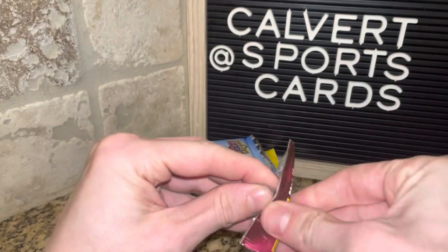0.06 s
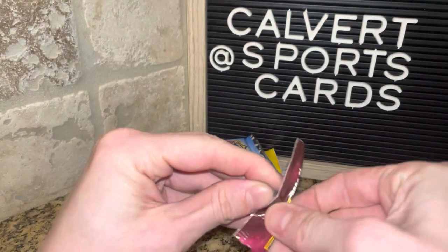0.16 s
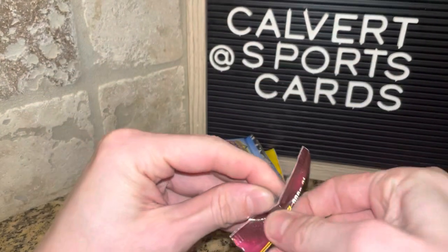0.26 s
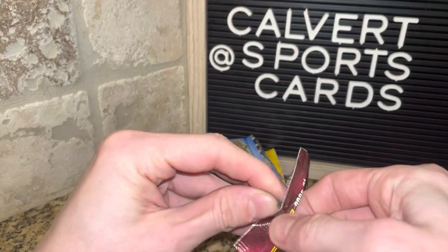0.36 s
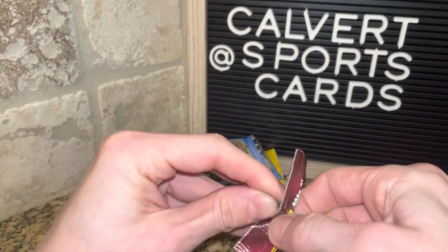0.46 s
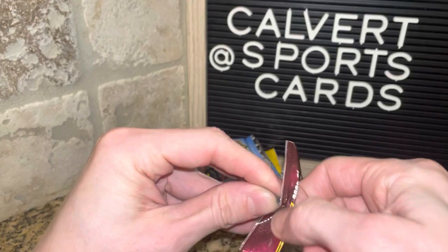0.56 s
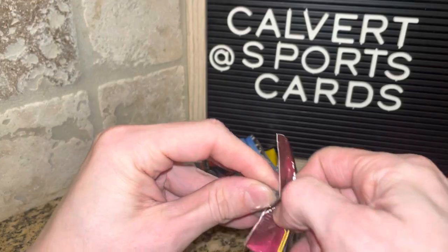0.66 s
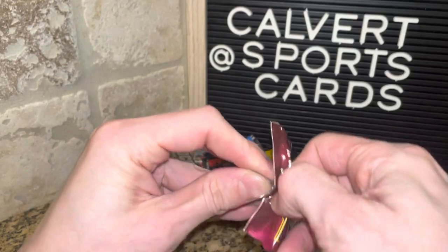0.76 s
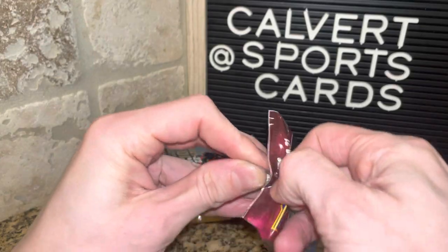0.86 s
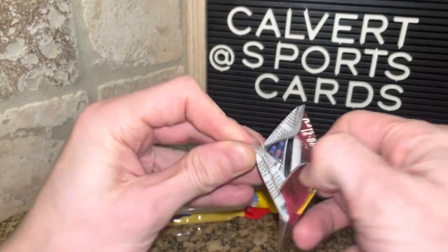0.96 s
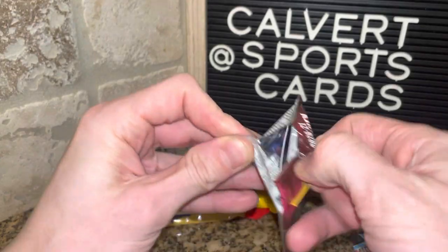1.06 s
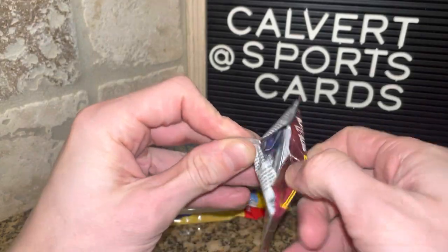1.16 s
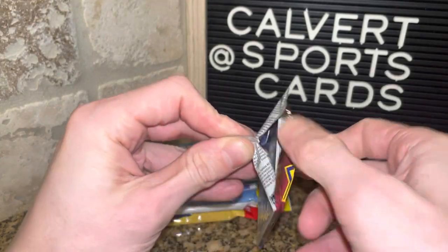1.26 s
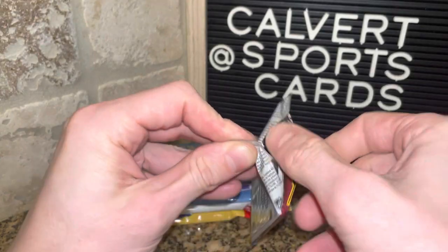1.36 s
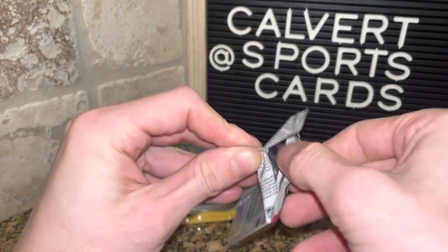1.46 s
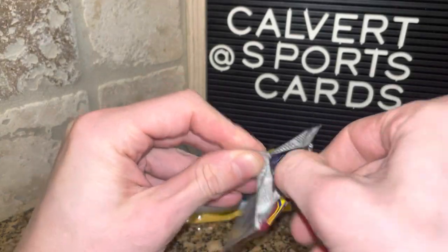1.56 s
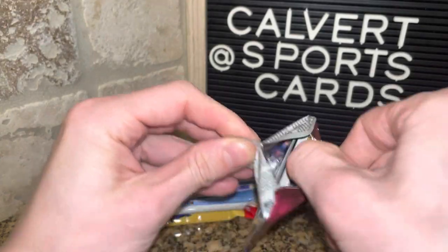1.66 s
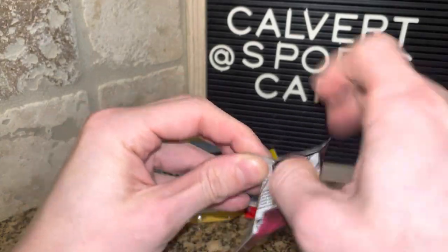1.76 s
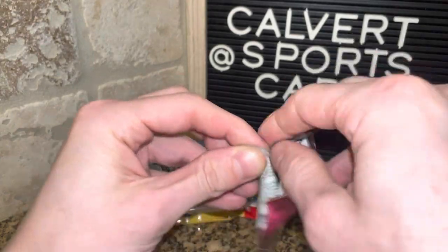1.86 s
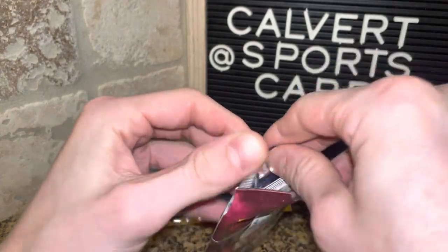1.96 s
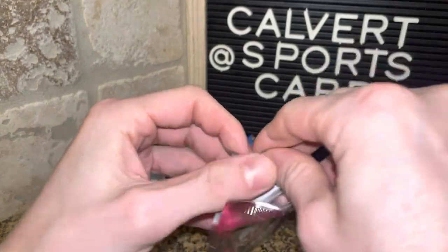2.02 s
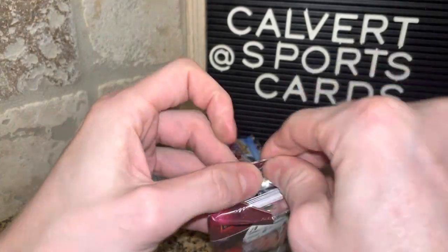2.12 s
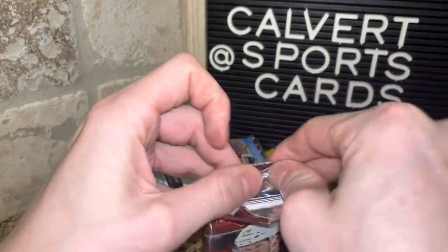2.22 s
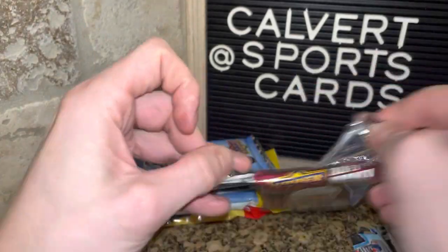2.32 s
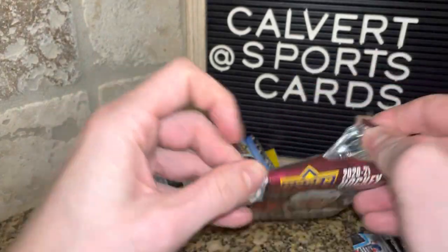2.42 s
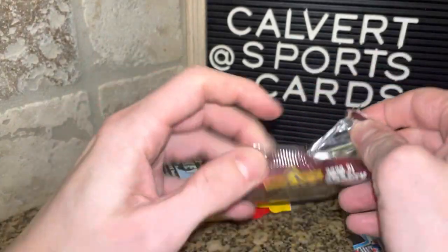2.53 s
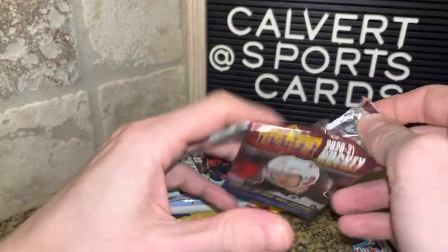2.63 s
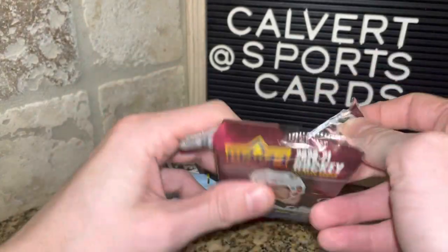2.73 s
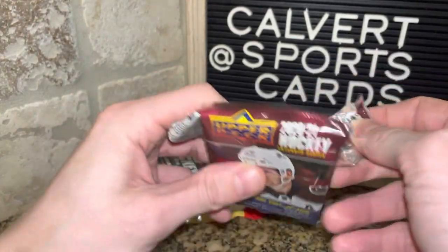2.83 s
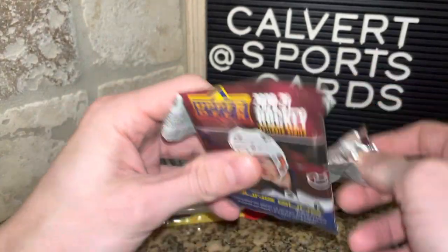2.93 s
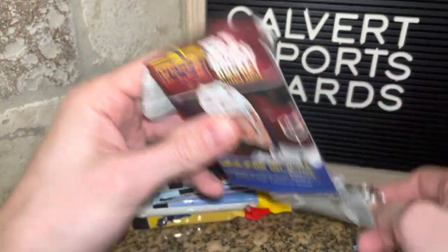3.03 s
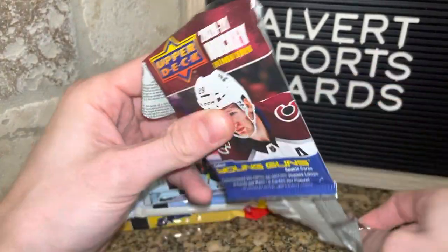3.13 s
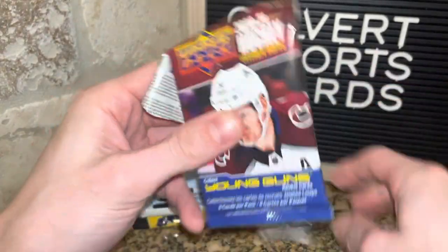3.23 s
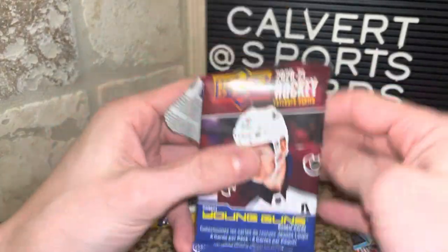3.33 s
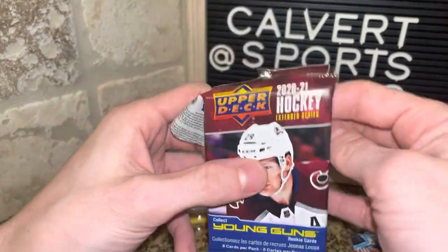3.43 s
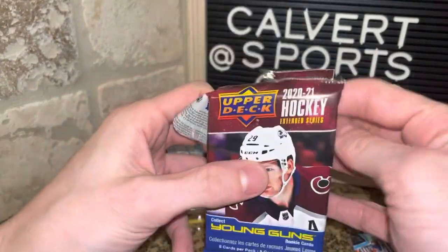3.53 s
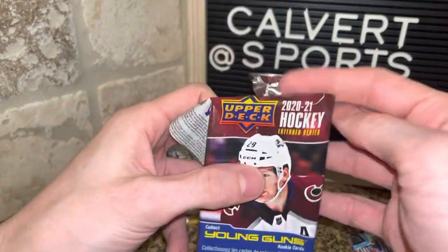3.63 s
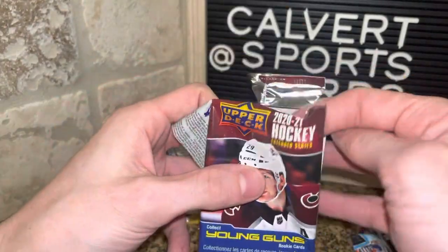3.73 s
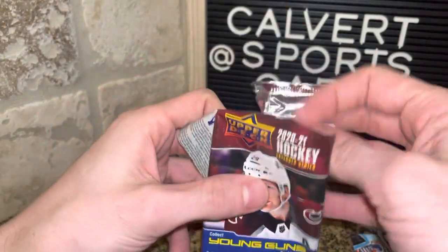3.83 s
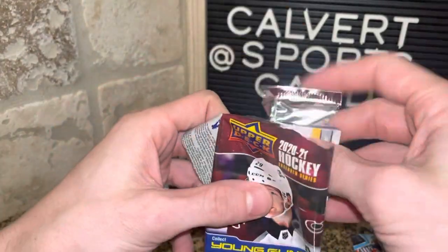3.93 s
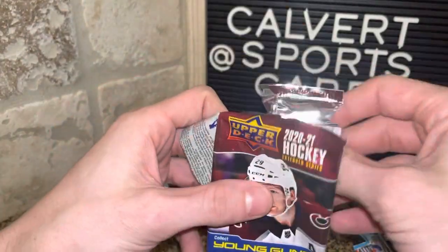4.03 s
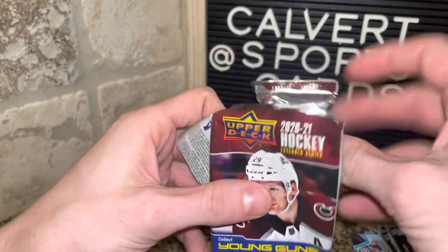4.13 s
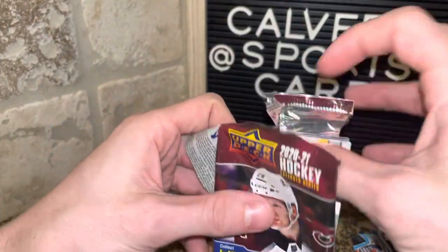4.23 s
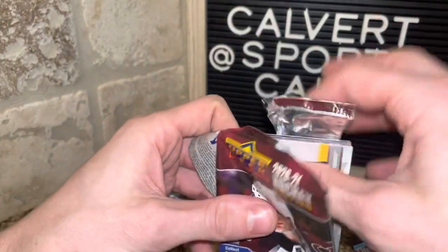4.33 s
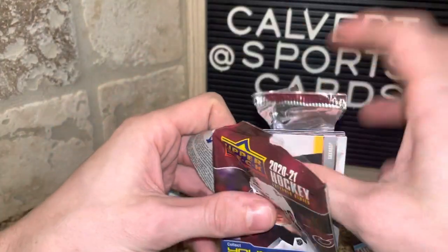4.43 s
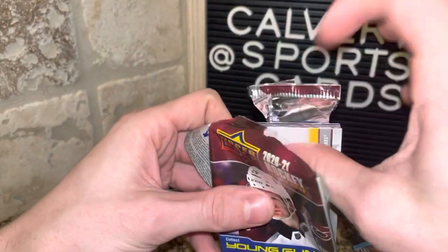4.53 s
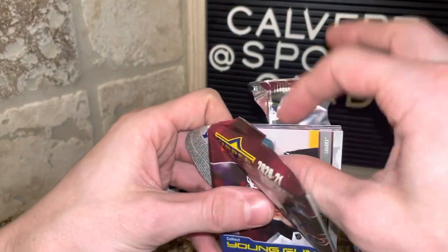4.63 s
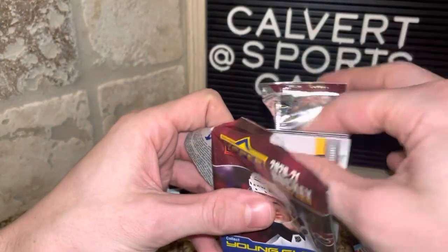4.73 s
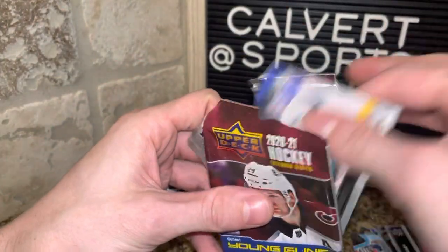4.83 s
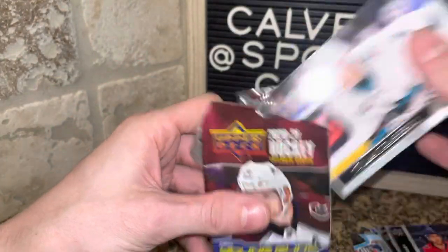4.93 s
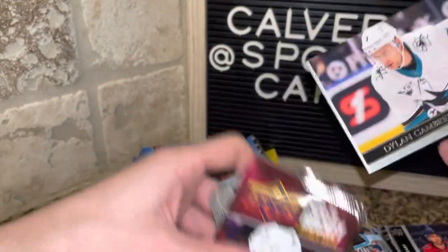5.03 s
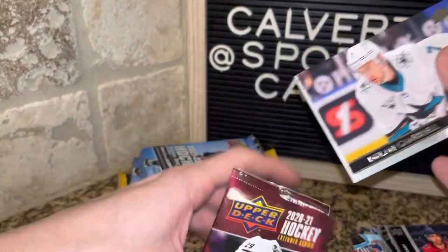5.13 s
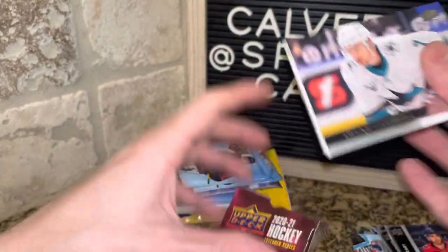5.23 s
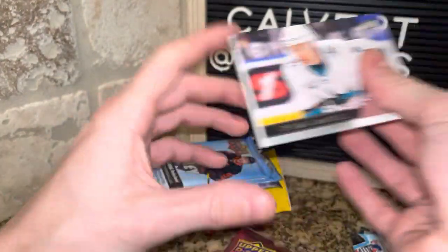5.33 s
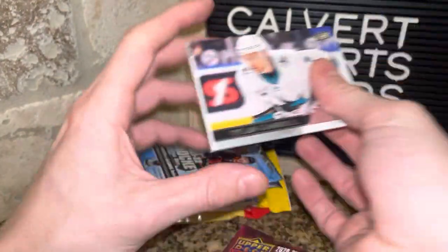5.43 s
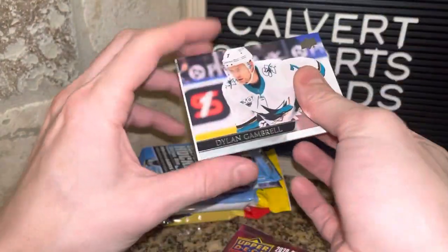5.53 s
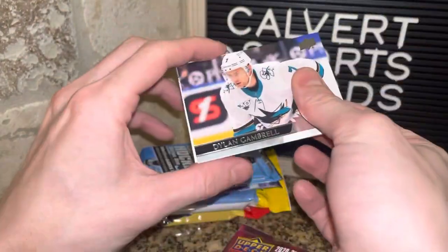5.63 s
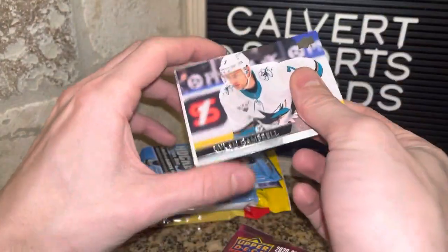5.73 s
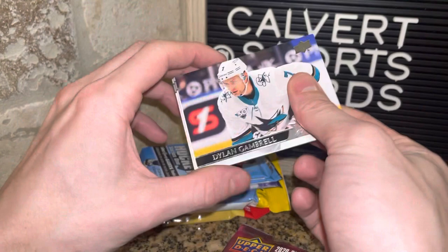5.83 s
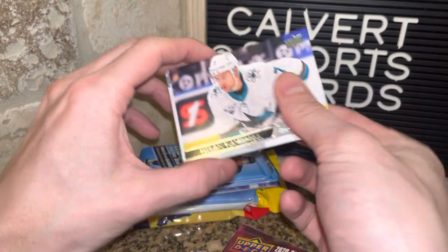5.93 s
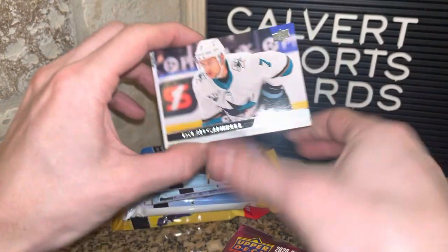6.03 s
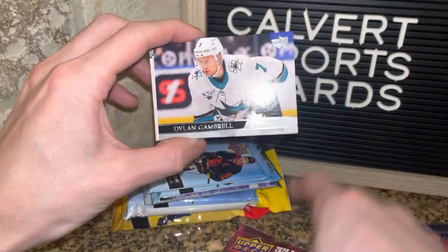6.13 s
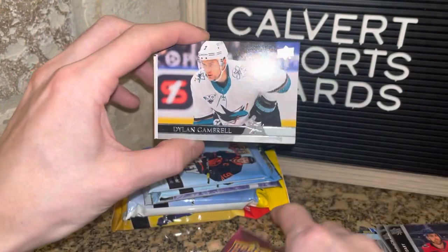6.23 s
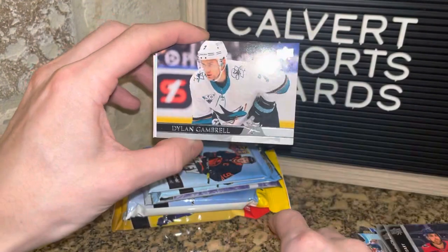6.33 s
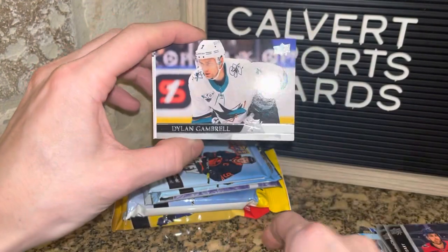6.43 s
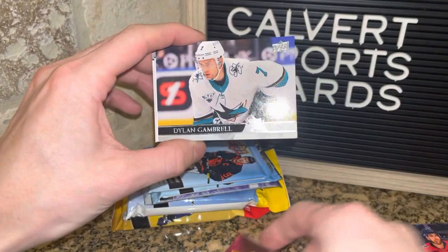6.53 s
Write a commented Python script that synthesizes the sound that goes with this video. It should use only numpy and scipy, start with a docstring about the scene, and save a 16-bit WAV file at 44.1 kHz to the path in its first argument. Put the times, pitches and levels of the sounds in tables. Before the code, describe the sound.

Hands tear open and crinkle a foil card wrapper up close, then the crackles thin out as cards slide free in a quiet room.

```python
"""A quiet room hums; just in front of a two-port phone microphone, hands work a foil card wrapper on a stone counter.
The first creases buckle, each a snap of a few milliseconds, and at 0.9 s the foil tears open.
Crumpling follows, loudest up to 3 s: fine crackle fills the gaps, hands thud, fingers tap the cards.
The snaps then thin out and pause near 5.4 s; a few faint ones come back around 6.3 s."""
import sys
import numpy as np
from scipy import signal
from scipy.fft import rfft, irfft
from scipy.io import wavfile
from scipy.ndimage import uniform_filter1d

SR = 44100
rng = np.random.default_rng(int(sys.argv[2]) if len(sys.argv) > 2 else 0)


def digitize_waveform(pressure):
    """Quantize a signal to 16-bit integers and store it at the path in sys.argv[1].

    Rows of a 2-D input are taken as channels; values are limited to [-1, 1].
    """
    field = np.atleast_2d(pressure).T
    bounded = np.clip(field, -1, 1)
    quanta = np.round(bounded * 32767).astype(np.int16)
    wavfile.write(sys.argv[1], SR, quanta)


N = 289737


def undb(db):
    """Gain of a level in dB."""
    return 10 ** (np.asarray(db) / 20)


def per_bin(table):
    """A table of (f/Hz, value) read at every frequency bin."""
    hz, value = np.transpose(table)
    return np.interp(np.log(np.fft.rfftfreq(N, 1 / SR) + 1), np.log(hz + 1), value)


def colour(x, spectrum):
    """Shape by a spectrum so that white noise keeps its power."""
    gain = undb(per_bin(spectrum))
    return irfft(rfft(x) * gain / np.sqrt(np.mean(gain ** 2)), N)


def resonate(x, hz, q):
    """Pass through a single resonance."""
    return signal.lfilter(*signal.iirpeak(hz, q, SR), x)


# Phase between the microphone ports: f/Hz, lead of left over right/rad
PORT_PHASE = [(60, 0), (300, 0), (600, -.9), (1200, -.8), (2500, -1.1), (4500, -.7), (6500, -.7),
              (7400, 2.6), (8300, 3.1), (9300, 4.3), (10200, 6.3), (11500, 7.4), (12500, 9.1), (13800, 9.6),
              (15000, 12.4), (16700, 12.6)]
# Balance between the ports: f/Hz, left minus right/dB
PORT_BALANCE = [(60, -0.5), (110, 1), (200, 2.5), (380, 4), (700, -6.5), (1290, -0.5), (2380, -4.5),
                (4400, -4), (8120, -1.5), (15000, 0.5)]
def microphone_ports(pair, likeness):
    """Two unrelated takes on a sound become left and right: a phase-shifted shared part and an own part."""
    shared, own = rfft(pair)
    alike = np.clip(per_bin(likeness), 0, 1)
    tilt = undb(per_bin(PORT_BALANCE) / 2)
    right = alike * shared * np.exp(-1j * per_bin(PORT_PHASE)) + np.sqrt(1 - alike ** 2) * own
    return irfft(np.array([shared * tilt, right / tilt]), N)


# Room tone at the counter: f/Hz, relative level/dB
ROOM_SPECTRUM = [(25, -18.5), (58, 1.5), (90, -5.5), (125, -7.5), (240, -3.5), (400, -14), (700, -24.5),
                 (1200, -42), (2500, -48.5), (5000, -46), (8500, -34), (12000, -39), (14000, -50),
                 (16000, -45.5)]
# How alike the two ports hear the room: f/Hz, likeness/0-1
ROOM_LIKENESS = [(60, .96), (150, .92), (300, .7), (700, .2), (3000, .45), (6500, .45), (8000, .95),
                 (15500, .9)]
def room_tone(level_db=-55.5):
    """The room behind the hands: a steady, low hum of noise."""
    hum = colour(rng.standard_normal((2, N)), ROOM_SPECTRUM)
    return undb(level_db) * microphone_ports(hum, ROOM_LIKENESS)


def wall_reflections(x, t60_s=0.057, level_db=-13.5):
    """Tiles and counter return a short, dull tail that reaches the microphone 3 ms late."""
    t = np.arange(int(.4 * SR)) / SR
    tail = rng.standard_normal((2, len(t))) * np.exp(-np.log(1000) * t / t60_s) * (t > .003)
    tail /= np.sqrt(np.sum(tail ** 2, axis=1, keepdims=True))
    dull_tail = signal.lfilter([.5], [1, -.4], tail)
    return undb(level_db) * signal.fftconvolve(x, dull_tail, axes=1)[:, :N]


# Peaks and one dip of the corner where counter meets tiles: f/Hz, width/Hz, lift/dB
CORNER_BANDS = [(463, 15, 5.5), (620, 14, 7.5), (1169, 170, 2.5), (1926, 110, 6), (2960, 95, 3),
                (3870, 100, 2), (4560, 83, 2), (5080, 250, 0), (6370, 140, -3.5)]
def counter_corner(x):
    """The corner lifts a few frequencies of whatever sounds in it."""
    hz = np.fft.rfftfreq(N, 1 / SR)
    lift_db = sum(db / (1 + (2 * (hz - centre) / width) ** 2) for centre, width, db in CORNER_BANDS)
    return irfft(rfft(x) * undb(lift_db), N)


# Hands and pack knocking, alike in both ports: t/s of the touch, level/dB, f/Hz
HAND_KNOCKS = [(0.854, -47, 128), (0.905, -45, 83.4), (1.581, -45, 161), (1.999, -53, 191),
               (2.233, -34.5, 80.7), (2.273, -36.5, 70.0), (2.496, -48, 70.0), (2.574, -43.5, 299),
               (2.647, -44, 137), (2.908, -46, 61.9), (2.984, -45, 200), (3.026, -37, 83.4),
               (3.147, -44.5, 127), (3.265, -44.5, 250), (3.319, -47, 80.7), (3.569, -39.5, 270),
               (3.722, -44, 240), (3.846, -39, 78.1), (3.916, -40.5, 114), (4.035, -42, 94.2),
               (4.131, -40, 83), (4.309, -45, 145), (4.596, -39, 210), (4.823, -40.5, 117),
               (4.878, -43.5, 167), (4.944, -45.5, 78.1), (5.071, -45, 286)]
def hand_thuds(sigma_s=.0054, peak_delay_s=.012):
    """Soft knocks of hands and pack: a few low cycles that swell and fade."""
    half = 2048
    out, t = np.zeros(N + 2 * half), np.arange(-half, half) / SR
    swell = np.exp(-.5 * (t / sigma_s) ** 2)
    for s, db, hz in HAND_KNOCKS:
        at = int((s + peak_delay_s) * SR)
        out[at:at + 2 * half] += undb(db) * swell * np.sin(2 * np.pi * (hz * t + rng.random()))
    return out[half:half + N]


# Fingers on the pack of cards, close up: t/s of the touch, level/dB, f/Hz
FINGER_TAPS = [(0.55, -49, 443), (0.613, -46, 490), (1.018, -40, 455), (2.088, -35, 660), (2.517, -36, 620),
               (3.193, -36, 510), (3.346, -35.5, 460), (3.591, -38, 455), (3.666, -34.5, 466),
               (3.734, -40, 634), (3.917, -31.5, 450), (3.994, -40, 463), (4.02, -38.5, 455),
               (4.3, -37.5, 460), (4.337, -40, 401), (4.594, -40, 443), (4.607, -39, 455),
               (4.882, -40, 430), (5.078, -30, 450), (5.135, -43.5, 444)]
def card_taps(push_ms=3.5, q=3.):
    """Each tap is a soft push that sets the stack of cards ringing hollowly."""
    size = 2048
    out, t = np.zeros((2, N + size)), np.arange(size) / SR
    for s, db, hz in FINGER_TAPS:
        push = rng.standard_normal((2, size)) * np.exp(-t * 1000 / push_ms)
        ring = resonate(resonate(push, hz, q), hz, q)
        at = int(s * SR)
        out[:, at:at + size] += undb(db) * ring / abs(ring).max(axis=1, keepdims=True)
    return out[:, :N]


# Papery rustle under the fingers: f/Hz, relative level/dB
RUSTLE_SPECTRUM = [(200, -21.5), (450, 1.5), (800, -2.5), (1250, 3.5), (2000, -6), (3000, -5.5),
                   (5000, -53.5)]
def rustle(noise):
    """The low, papery side of handling foil and cards."""
    return colour(noise, RUSTLE_SPECTRUM)


# Foil at close range: f/Hz, relative level/dB
FOIL_SPECTRUM = [(1500, -17), (2500, -7), (4000, -2.5), (6500, -2), (8300, 1.5), (11500, 5), (12800, 7.5),
                 (14000, -16), (15600, -7), (16100, -48), (17000, -46.5)]
def foil_bands(noise, split_hz=7730):
    """The foil's sparkle above the split and its body below, each at rms 1."""
    foil = colour(noise, FOIL_SPECTRUM)
    filters = [signal.butter(4, split_hz, kind, fs=SR, output="sos") for kind in ("high", "low")]
    bands = [signal.sosfilt(sos, foil) for sos in filters]
    return [band / np.std(band) for band in bands]


# Fingers resting and shifting on foil and cards: t/s, sparkle/dB, body/dB, rustle lift/dB
RESTING_FINGERS = [(0.0, -52.5, -57.5, 1.5), (0.37, -83, -78, -2), (0.55, -91, -71, 3),
                   (0.8, -52.5, -59.5, -5.5), (0.99, -52, -44, 0.5), (1.19, -55, -57, 6.5),
                   (1.37, -66.5, -62, 0.5), (1.7, -58, -48.5, 1), (2.1, -57, -46.5, -0.5),
                   (2.19, -45, -49, -0.5), (2.69, -46.5, -51.5, 2), (2.84, -63, -47.5, 1),
                   (3.38, -55, -54, 5), (3.53, -67, -66, -7), (3.68, -47, -44.5, -4), (3.88, -52, -51.5, 0),
                   (4.13, -57.5, -65, 0.5), (4.94, -56.5, -69, 1.5), (5.12, -69, -74, 6),
                   (5.36, -70.5, -81, 0), (5.84, -79.5, -76.5, 0.5), (6.28, -59.5, -69.5, 0),
                   (6.42, -49, -52.5, 0), (6.57, -57, -58.5, 2.5)]
# Pulls, tears and slides: t/s of the peak, swell/ms, fade/ms, sparkle/dB, body/dB
FOIL_PULLS = [(.135, 110, 107, -49.5, -56), (.31, 16, 240, -60, -74), (.555, 15, 250, -59, -55.5),
              (.66, 37, 110, -40.5, -51.5), (.7, 50, 30, -41.5, -52), (.75, 20, 100, -58, -63),
              (.865, 10, 60, -33, -53), (0.909, 25, 49, -20.5, -19.5), (1.22, 52, 49, -57, -50),
              (1.345, 34, 170, -50, -46.5), (1.455, 97, 130, -41.5, -48.5), (1.584, 30, 45, -31, -25),
              (1.753, 190, 32, -42.5, -36), (1.82, 21, 100, -36, -44), (1.906, 60, 69, -39, -39),
              (2.016, 13, 220, -40.5, -36), (2.1, 73, 50, -36, -48), (2.233, 6.7, 120, -31, -26),
              (2.3, 59, 116, -37, -32), (2.649, 250, 79, -38.5, -38.5), (2.8, 30, 77, -51, -57),
              (2.917, 86, 88, -37, -39), (2.996, 62, 85, -29, -30), (3.154, 43, 35, -41, -39.5),
              (3.189, 24, 26, -35.5, -39), (3.301, 55, 160, -45, -42.5), (3.499, 18, 130, -36, -49),
              (3.568, 56, 52, -29.5, -27.5), (3.671, 54, 52, -31, -29.5), (3.75, 82, 140, -40, -42.5),
              (3.909, 29, 39, -44, -40.5), (4.015, 110, 143, -42.5, -44), (4.334, 79, 660, -51.5, -49.5),
              (4.603, 17, 160, -69, -48.5), (4.824, 120, 540, -47.5, -45), (5.084, 28, 90, -50, -47.5),
              (5.22, 22, 110, -67, -57), (5.338, 40, 75, -63.5, -62), (5.75, 25, 18, -48.5, -58.5),
              (6.05, 154, 170, -53.5, -75), (6.304, 80, 260, -44.5, -47.5)]
def handling_levels(span_db=20, rustle_under_body_db=9.5):
    """Sparkle, body and rustle in dB: resting fingers plus pulls that swell and fade over span_db."""
    t = np.arange(N) / SR
    rest_s, *rest_db, lift_db = np.transpose(RESTING_FINGERS)
    power = undb([np.interp(t, rest_s, db) for db in rest_db]) ** 2
    for s, swell_ms, fade_ms, *peak_db in FOIL_PULLS:
        below_db = span_db * np.maximum((s - t) / swell_ms, (t - s) / fade_ms) * 1000
        active = below_db < 3 * span_db
        power[:, active] += undb(np.array(peak_db)[:, None] - below_db[active]) ** 2
    sparkle_db, body_db = 10 * np.log10(power)
    return sparkle_db, body_db, body_db - rustle_under_body_db + np.interp(t, rest_s, lift_db)


def flicker(per_s=30., spread_db=6.5):
    """A gain that glides from one random level to the next."""
    hold = int(SR / per_s)
    steps = np.repeat(rng.standard_normal(N // hold + 1), hold)
    return undb(spread_db * np.sqrt(3 / 2) * uniform_filter1d(steps, hold)[:N])


# Resonances of the wrapper's flat facets: f/Hz
FACET_MODES = [2010, 2730, 3300, 4150, 5200, 6160, 7450]
def foil_crackle(levels_db, grains_per_s=800., grain_s=.002, spread_db=3., hiss=.6):
    """Countless small folds: random grains over a rubbing hiss, through facets that keep changing shape."""
    chance, strength = rng.random((2, N))
    folds = (chance < grains_per_s / SR) * undb(-spread_db * np.log(1 - strength))
    grains = signal.lfilter([1], [1, -np.exp(-1 / (grain_s * SR))], folds)
    rubbing = rng.standard_normal((2, N)) * (hiss + grains / np.sqrt(np.mean(grains ** 2)))
    sparkle, body = foil_bands(rubbing)
    facets = sum(flicker() * resonate(body, hz, q=5.) for hz in FACET_MODES)
    layers = [sparkle, facets / np.std(facets), rustle(rubbing / np.std(rubbing))]
    return sum(layer * undb(db) for layer, db in zip(layers, levels_db))


def jagged_noise(rough_db=4.5, hold_s=.0004):
    """Pair of noises whose strength jumps as tiny folds let go one after another."""
    hold = int(hold_s * SR)
    jumps = undb(rough_db * np.repeat(rng.standard_normal(N // hold + 1), hold)[:N])
    return rng.standard_normal((2, N)) * jumps / np.sqrt(np.mean(jumps ** 2))


def small_creases(sparkle_db, count=120, until_s=5.4):
    """Chance rows like LOUD_CREASES, 2-10 dB over the crackle's sparkle, until the foil is dropped."""
    when, size, body, facet, ring, pocket, length = rng.random((count, 7)).T
    s = when * until_s
    db = sparkle_db[(s * SR).astype(int)] + 2 + 8 * size
    body_rel_db, body_hz = -12 + 9.8 * body, 2700 * 2.5 ** facet
    ring_rel_db, ring_hz = -22 + 14.3 * ring, 420 * 4.4 ** pocket
    return list(zip(s, db, body_rel_db, body_hz, ring_rel_db, ring_hz, 1.19 + 1.6 * length))


# Creases buckling right at the microphone: t/s of the peak, sparkle level/dB, body/dB re sparkle,
# body f/Hz, pocket ring/dB re sparkle, ring f/Hz, length/ms
LOUD_CREASES = [(0.1144, -45.5, 1, 4500, -11, 480, 1.8), (0.1293, -25, -4, 3430, -13, 2140, 1.9),
                (0.301, -39, -10, 6700, -32, 420, 2.1), (0.3061, -34.5, -13, 6700, -36, 420, 2.2),
                (0.459, -44, -6, 5300, -17, 426, 2), (0.5457, -32.5, 0, 4000, -10, 985, 2.7),
                (0.5947, -30.5, -19, 6300, -19, 1060, 1.2), (0.6257, -54.5, 8, 5800, 2, 420, 2.3),
                (0.643, -23, -1.5, 5800, -29, 2540, 1.3), (0.7343, -26, -6, 6950, -14, 1750, 2.3),
                (0.7418, -24, -7, 6000, -35, 1270, 2), (0.7709, -24, -8, 6300, -32, 420, 2.5),
                (0.7882, -42, -9, 6300, -22, 420, 1.5), (0.8165, -46, -17, 5000, -21, 420, 1.7),
                (0.8294, -28, -5, 6240, -19, 2420, 3.1), (0.8535, -30, -3, 6100, -20, 2370, 2.2),
                (0.8594, -16, -11, 6060, -25, 420, 1.8), (0.881, -18.5, -2, 5460, -18, 1870, 2.3),
                (0.8877, -18.5, -17, 6200, -33, 1840, 0.8), (0.9019, -8.5, -4, 4600, -21.5, 2500, 3.3),
                (0.9127, -11, -7, 6960, -15, 1920, 1.15), (0.9265, -23, -15, 6100, -5, 2400, 1.4),
                (0.9355, -20.5, -2, 2720, -9, 1900, 3.1), (0.9488, -21, 1.5, 3000, -5.5, 2410, 4.1),
                (0.9736, -23, -1, 2770, -12, 1980, 3.6), (1.0184, -23.5, 2.5, 6400, -10.5, 680, 2.1),
                (1.0548, -43, 8.5, 2680, -2, 1940, 1.9), (1.0942, -32, 1.5, 4400, -8, 2500, 1.9),
                (1.1359, -21.5, -10, 6240, -33, 2050, 1.5), (1.183, -36, -6, 3600, -9, 1250, 1.2),
                (1.218, -34.5, 0.5, 3040, -4.5, 420, 3.2), (1.246, -47, -1, 6170, -8, 420, 2.0),
                (1.382, -40.5, 5, 6360, -8, 1160, 3.9), (1.4225, -31.5, -5, 6500, -13, 1290, 2.7),
                (1.4466, -18, -1.5, 6160, -10.5, 1990, 1.64), (1.4696, -31, -20, 5900, -24, 2000, 1.7),
                (1.5365, -37.5, -5, 3500, -17, 1000, 1.7), (1.5565, -28, -6, 2780, -13, 1400, 1.3),
                (1.5696, -25.5, -2, 3900, -3, 720, 2.0), (1.5821, -11, -12, 5850, -10, 1280, 1.6),
                (1.589, -12, 1.5, 5900, -8.5, 1220, 3), (1.6127, -32, 9.5, 3800, -1.5, 1660, 1.4),
                (1.6631, -44, 11, 3080, -5, 1250, 2.2), (1.6824, -24.5, -1, 4400, -20, 1210, 1.3),
                (1.6931, -28, 2.5, 3870, -8.5, 990, 2.5), (1.7106, -36, 7, 2720, 3.5, 1990, 3.1),
                (1.76, -26, -1, 4200, -6, 1880, 3.6), (1.8102, -23.5, 4, 6270, -5.5, 1080, 1.13),
                (1.8306, -23.5, 1, 5900, -6, 1150, 1.7), (1.8458, -38, -7, 4500, -11, 1240, 1.7),
                (1.8701, -19, -7, 5100, -18, 2500, 1.8), (1.8979, -32.5, 4.5, 6100, -5, 1270, 3.6),
                (1.9117, -21.5, -3.5, 3260, -30, 2500, 1.4), (1.9328, -38, 0, 2800, -10, 1390, 2.2),
                (2.009, -21, 1, 6150, -5, 1940, 2.8), (2.0184, -18, -1, 5600, -25, 1930, 4.1),
                (2.044, -25, 2, 4030, -1.5, 1970, 2.2), (2.0818, -20.5, -1, 6850, -14.5, 1750, 3.3),
                (2.09, -28, 5.5, 3780, -2, 674, 1.2), (2.1066, -22.5, -14, 6700, -25, 1950, 8.8),
                (2.139, -29.5, -4, 6400, -20, 1770, 1.9), (2.1593, -38, 1, 2800, -8, 1860, 1.9),
                (2.1729, -18.5, -5, 5200, -20.5, 1110, 1.9), (2.1986, -57, -1, 6400, -7, 1990, 1.1),
                (2.2275, -11, -5.5, 6000, -10.5, 1830, 3.2), (2.2359, -21, 4, 2920, 2.5, 1310, 1.6),
                (2.2482, -17.5, -1.5, 4100, -41, 1360, 2.3), (2.26, -19.5, 0, 2960, -10.5, 1640, 1.8),
                (2.2932, -15, -1.5, 3140, -19, 1230, 2.2), (2.3103, -10, -10, 6300, -27, 515, 1.5),
                (2.3179, -19.5, -16, 3100, -17, 750, 1.5), (2.3456, -22.5, 0.5, 4000, -15, 1750, 2.1),
                (2.3665, -37, 7, 3100, 4, 2210, 1.8), (2.3859, -29.5, -1, 4300, -17, 704, 1.7),
                (2.4152, -26, 0.5, 6200, -9, 2200, 2.4), (2.4336, -29, -8, 5900, -21, 1960, 2.9),
                (2.5022, -21.5, -0.5, 3100, -8, 1900, 4.3), (2.5183, -26, -12, 4600, -15, 2010, 1.5),
                (2.5685, -46, 7, 3500, 5, 714, 1.2), (2.584, -23.5, -5, 5800, -1, 1890, 4.1),
                (2.6403, -30, 3, 4000, -19, 1960, 3.7), (2.6483, -28.5, 1, 6100, -10, 2000, 2.7),
                (2.6705, -28.5, -5.5, 3000, -11, 1190, 2.3), (2.7012, -36.5, 6, 2960, -1.5, 2010, 2.4),
                (2.751, -35, 10, 3930, -3.5, 1960, 3), (2.7947, -30, 1.5, 3900, -5, 600, 2.6),
                (2.8085, -34, -1.5, 3400, -0.5, 2010, 3), (2.8343, -29.5, -15, 6700, -7.5, 1200, 1.7),
                (2.8689, -24.5, 1, 5500, -15, 1350, 2.3), (2.8737, -33, -3, 5730, 2, 2160, 1.4),
                (2.9129, -17, 0.5, 3940, -9.5, 2200, 2.1), (2.9233, -30.5, -2, 3000, -3, 1560, 2),
                (2.9408, -22.5, 1, 6300, -9, 2310, 2.6), (2.9718, -31, -5, 5100, -8, 1100, 4.5),
                (2.9855, -21, 1.5, 5830, -5, 1940, 2.2), (2.9908, -13.5, -10, 4470, -18, 1580, 2),
                (3.0082, -23.5, -6, 4000, -17, 1960, 1.3), (3.0162, -10, -17, 6900, -15, 1650, 1.3),
                (3.0291, -29, -4, 4100, 0, 1390, 1.6), (3.0388, -10, -5.5, 5740, -13, 1050, 2),
                (3.1244, -30.5, -6, 5000, -19, 2210, 1.8), (3.151, -29.5, -11, 6100, -5.5, 1280, 3.1),
                (3.1586, -33.5, -2, 5100, 1, 1240, 2.6), (3.1812, -29, -13, 7100, -6, 1560, 2.5),
                (3.1953, -33, -4, 3100, 0.5, 754, 1.7), (3.2205, -30, -22, 6900, -14, 640, 2),
                (3.2698, -44, -6, 2500, 8, 1950, 2.1), (3.2991, -42.5, 1, 3670, 3, 1100, 3.2),
                (3.3172, -22, -6, 2750, -11.5, 1060, 2.4), (3.4896, -26.5, -6, 5300, -13, 2030, 2.4),
                (3.5218, -30, -11, 6000, -31, 420, 1.2), (3.5385, -26, -1, 5300, -11, 1170, 1.4),
                (3.5677, -30.5, 6.5, 5300, -10, 1900, 4.6), (3.5921, -29, 6, 4030, -1, 463, 1.6),
                (3.6273, -25.5, -7, 6800, -16, 420, 1.2), (3.6391, -35, 4, 3100, -22, 2280, 1.9),
                (3.6592, -21, -11, 3100, -23, 1990, 1.1), (3.6669, -25.5, -3, 5900, -4, 1060, 2.2),
                (3.6823, -36, -8, 5900, -14, 1030, 1.2), (3.7071, -39, -11, 3100, -30, 1120, 2.3),
                (3.7265, -23.5, -3.5, 3000, -15.5, 685, 4.4), (3.7899, -37, 3, 6500, -18, 1140, 2.6),
                (3.8207, -22.5, -10, 6100, -39, 1100, 1.3), (3.8351, -39, -6, 2900, -23, 420, 1.8),
                (3.8482, -37, -4, 5800, -9, 420, 1.8), (3.8938, -35, -6, 6100, 0.5, 2010, 1.5),
                (3.9094, -31.5, -14, 3000, -2.5, 1200, 2.1), (3.9704, -25, -8.5, 5200, -12.5, 2060, 2.6),
                (4.0144, -32, -12, 2900, -5, 1550, 2.2), (4.0392, -32.5, -8, 5900, -8, 990, 2.1),
                (4.1146, -27.5, -5, 3180, -27, 810, 3.9), (4.1239, -25.5, 4, 5460, -18, 674, 2.4),
                (4.3014, -43, 0, 4800, 2.5, 507, 5.3), (4.3301, -12.5, -10.5, 6500, -18.5, 1740, 1.97),
                (4.3725, -41, 8, 4600, 3, 417, 1.4), (4.3849, -37.5, -5, 5100, -5, 420, 4.7),
                (4.425, -41.5, 5.5, 4500, -2, 1250, 3.9), (4.4947, -49, -22, 5200, -32, 420, 1.3),
                (4.5739, -40.5, 2, 4400, -18, 1170, 1.6), (4.6029, -40.5, 11.5, 3520, 6, 430, 1.43),
                (4.6536, -51, 7.5, 4450, 1, 1200, 3.2), (4.7615, -39, -3, 4900, -19, 420, 1.4),
                (4.8021, -39, 2, 4440, -8, 1220, 1.9), (4.8131, -34, -9, 3800, -21, 1100, 1.5),
                (4.8261, -22, -5, 3750, -12.5, 1060, 7.2), (4.8448, -26, -3, 6000, -12, 1590, 3),
                (4.8657, -36.5, 0, 3000, 6.5, 1220, 1.4), (4.8844, -34, -0.5, 2700, -3, 433, 2),
                (4.9219, -30.5, -1, 2980, -14, 1000, 2.5), (4.943, -31, 1, 2700, -9, 2500, 2.1),
                (5.0782, -27.5, 4, 5870, 1, 1300, 2.8), (5.1036, -37, -8, 5900, -6, 2200, 2.1),
                (5.2049, -43, -1, 5340, -11, 1280, 3.5), (5.2294, -40, 1, 2640, 4.5, 2460, 3.2),
                (5.3206, -42, -3, 3300, -7.5, 526, 2.0), (5.3382, -46.5, 1, 7060, -3.5, 1320, 4.6),
                (5.3532, -43, -8, 3480, -18.5, 420, 1.9), (5.7493, -52, -13, 3300, -5.5, 1890, 11.6),
                (6.1859, -47.5, -4, 2595, -13, 424, 2.1), (6.2308, -40.5, -3.5, 3500, -6, 2460, 2.6),
                (6.2703, -46, -11, 5900, -31, 420, 1.4), (6.2955, -43, -16, 2530, -0.5, 2440, 5.3),
                (6.3127, -36.5, -1, 3200, -5.5, 480, 2.2), (6.3437, -41, -14, 4600, -28, 420, 1.1),
                (6.3564, -50, -15, 6700, -24, 420, 1.1), (6.3741, -40, 3.5, 6950, -13, 420, 7.2),
                (6.5318, -46, 4, 2500, 4, 2330, 2.8)]
def crease_snaps(sparkle_db, rise=.32, fall=.71, broad=.5, papery=.75, ring_slower=1.55):
    """Each crease: a jagged burst of sparkle, the facet's body resonance, the ring of the fold's air pocket."""
    creases = LOUD_CREASES + small_creases(sparkle_db)
    lead, size = 512, 2048
    padding = ((0, 0), (0, size))
    out, t = np.zeros((2, N + size)), (np.arange(size) - lead) / SR
    high, low = (np.pad(band, padding, "wrap") for band in foil_bands(jagged_noise()))
    drive = rng.standard_normal((2, N + size))
    paper = np.pad(rustle(drive[::-1, :N]), padding, "wrap")
    for s, db, body_rel_db, body_hz, ring_rel_db, ring_hz, ms in creases:
        at = slice(int(s * SR), int(s * SR) + size)
        rise_s, fall_s = rise * ms / 1000, fall * ms / 1000
        # the buckle builds up quickly and dies away in the crumpled sheet
        buckle = np.where(t < 0, np.exp(-.5 * (t / rise_s) ** 2), np.exp(-t / fall_s))
        sparkle, body = high[:, at] * buckle, low[:, at] * buckle
        body = broad * body + resonate(body, body_hz, q=6.7)
        ring = resonate(drive[:, at] * buckle ** (1 / ring_slower), ring_hz, q=4.)
        ring = ring / np.std(ring) + papery * paper[:, at] * buckle / np.std(buckle)
        for part, rel_db in ((sparkle, 0), (body, body_rel_db), (ring, ring_rel_db)):
            to_buckle_energy = np.sqrt(np.sum(buckle ** 2) / np.sum(part ** 2, axis=1, keepdims=True))
            out[:, at] += undb(db + rel_db) * part * to_buckle_energy
    return out[:, lead:lead + N]


# How alike the two ports hear the wrapper just in front of them: f/Hz, likeness/0-1
CLOSE_LIKENESS = [(60, .97), (250, .85), (500, .72), (1200, .84), (2500, .7), (4500, .78), (6500, .6),
                  (8000, .95), (12500, .91), (14000, .7), (15500, .92)]
def scene():
    """Wrapper and hands close to the microphone in the tiled corner, the room behind them."""
    levels_db = handling_levels()
    snaps = crease_snaps(sparkle_db=levels_db[0])
    wrapper = snaps + wall_reflections(snaps) + foil_crackle(levels_db) + card_taps()
    close = microphone_ports(counter_corner(wrapper), CLOSE_LIKENESS)
    return close + hand_thuds() + room_tone()


def record(dry):
    """The phone drops the bass below 38 Hz, clips at full scale and cuts the top at 16.9 kHz."""
    low_cut = signal.butter(2, 38, "high", fs=SR, output="sos")
    top_cut = signal.ellip(10, .2, 90, 16900, fs=SR, output="sos")
    clipped = np.clip(signal.sosfilt(low_cut, dry), -1, 1)
    return signal.sosfilt(top_cut, clipped)


dry = scene()
out = record(dry)
digitize_waveform(out)
```